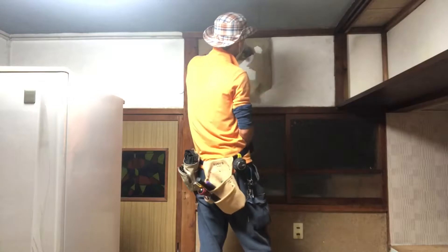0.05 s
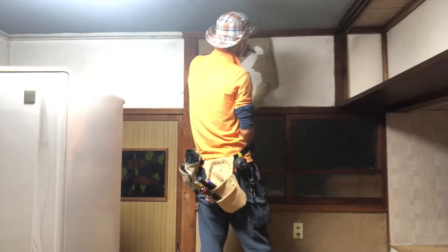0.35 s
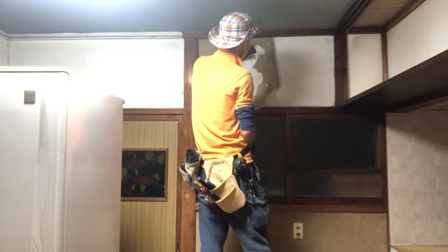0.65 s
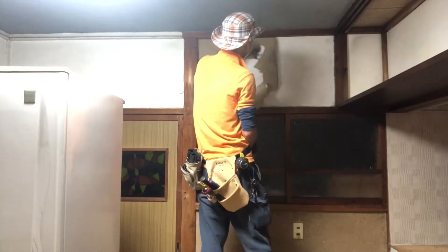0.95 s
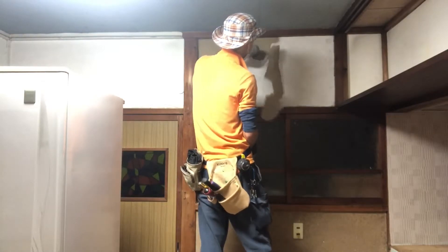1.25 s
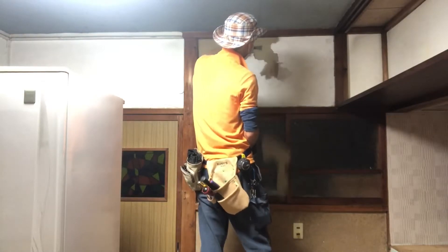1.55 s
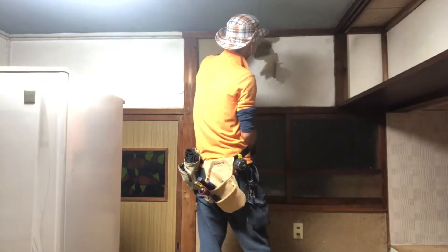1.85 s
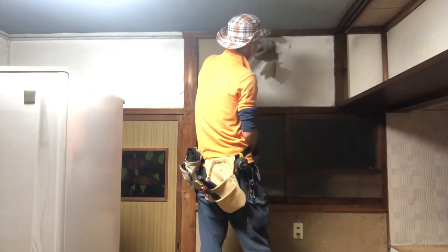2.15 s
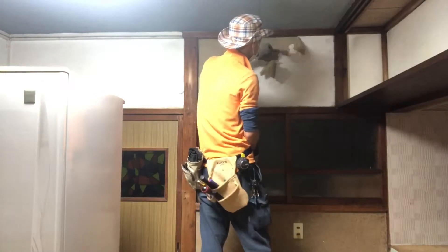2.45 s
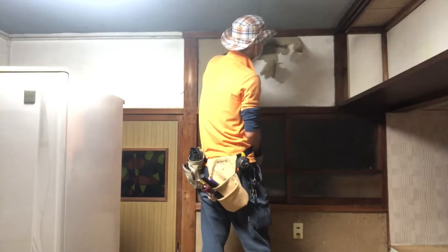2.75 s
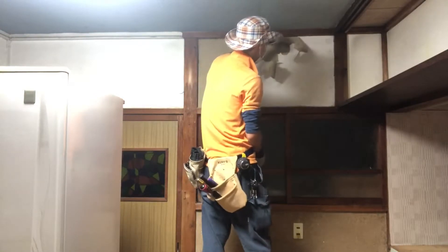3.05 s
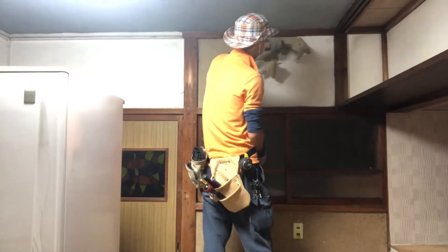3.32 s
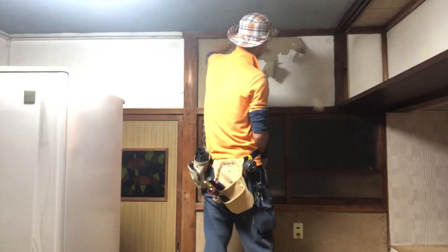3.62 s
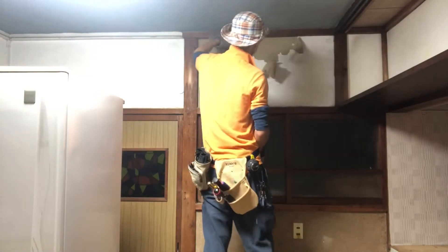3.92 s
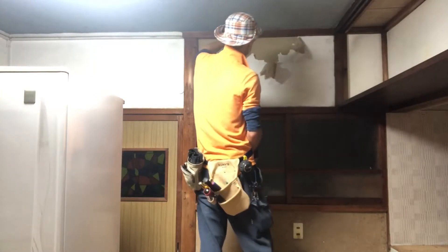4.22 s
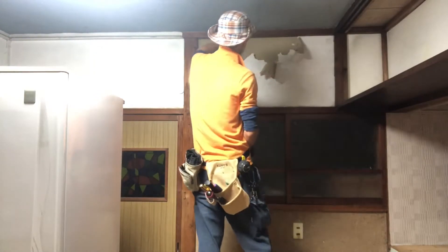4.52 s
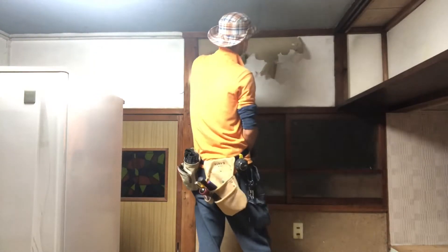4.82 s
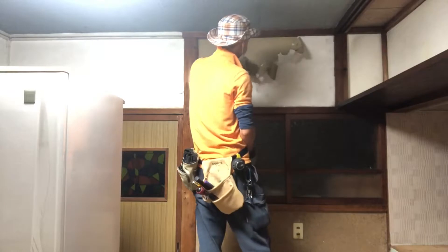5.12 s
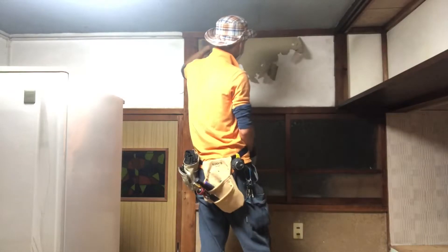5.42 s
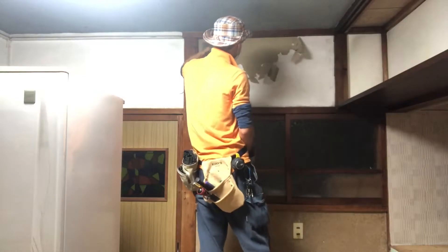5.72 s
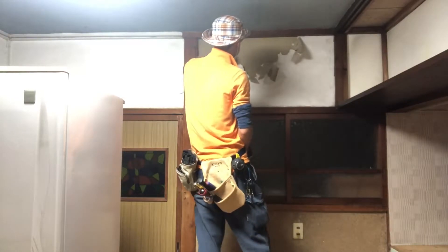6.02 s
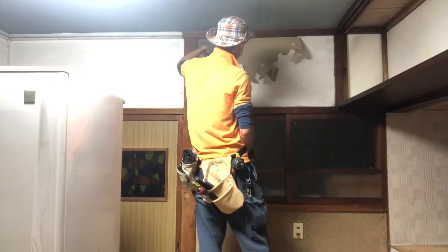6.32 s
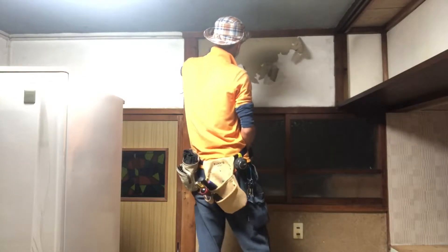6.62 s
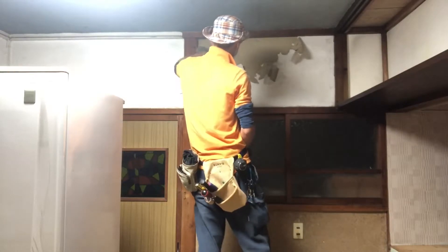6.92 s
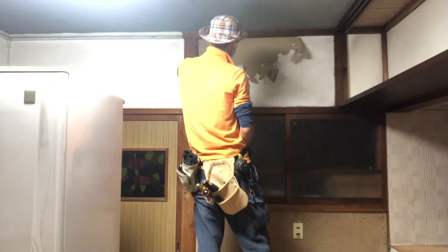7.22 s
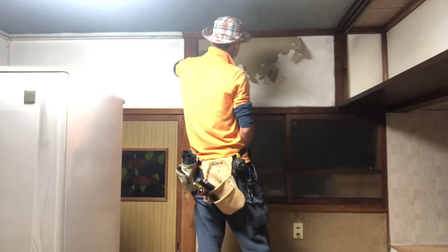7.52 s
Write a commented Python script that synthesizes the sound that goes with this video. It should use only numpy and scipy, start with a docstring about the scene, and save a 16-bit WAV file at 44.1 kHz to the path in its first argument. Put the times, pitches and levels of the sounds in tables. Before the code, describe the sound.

Brittle coating crackles and sand hisses as a metal blade pushes along a wall in irregular strokes. The blade judders, knocks and rings softly while the panel rumbles underneath and pieces snap away. Early on, a loosened sheet hits the wooden floor with a loud slap; a chip ticks down soon after, then busier scraping follows. It is heard from a short distance in a quiet, small room with a brief echo.

```python
"""A small wooden room, where a worker pushes a steel scraper under the dry coating of a sandy wall.
Each push crackles over hissing sand, a hollow rasp of loose sheet and the rumble of the panel.
The blade judders, knocks on the wall and sings as it slides on sand; larger pieces snap off.
A large sheet crashes onto the floorboards, and later a small chip lands with a tick."""
import sys
import numpy as np
from scipy import signal
from scipy.io import wavfile

SR = 44100
rng = np.random.default_rng(int(sys.argv[2]) if len(sys.argv) > 2 else 0)


def to_wav(s):
    """Save 16-bit WAV."""
    ch = np.atleast_2d(s).T  # columns
    pcm = np.round(np.clip(ch, -1, 1) * 32767)  # PCM
    wavfile.write(sys.argv[1], SR, pcm.astype(np.int16))


N = 337627
TIME = np.arange(N) / SR

# pushes of the scraper: t/s, swell/s, hold/s, crackle/dB, sand/dB, rasp/dB, wall rumble/dB
PUSHES = [ (0.0, 0.0017, 0.085, -46, -56.5, -52.5, -62), (0.131, 0.035, 0.11, -59.5, -56.5, -58.5, -64),
          (0.28, 0.051, 0.12, -49, -54.5, -59, -61), (0.36, 0.066, 0.15, -47.5, -58, -48.5, -65),
          (0.471, 0.0023, 0.0028, -47, -41, -46, -68), (0.71, 0.053, .03, -63.5, -72, -65, -70),
          (0.795, 0.062, 0.036, -44, -49.5, -46.5, -60.5), (0.919, 0.035, 0.024, -46.5, -54.5, -55.5, -63),
          (1.055, 0.031, 0.046, -44.5, -52, -51, -62), (1.164, 0.045, 0.047, -54.5, -62.5, -57, -69),
          (1.285, 0.018, 0.0077, -56.5, -57, -55.5, -59.5), (1.66, 0.056, 0.0088, -52, -49.5, -52, -52),
          (1.74, 0.06, 0.087, -48, -55, -57.5, -54), (2.036, 0.04, 0.088, -58.5, -63.5, -57, -66),
          (2.182, 0.067, 0.012, -50, -53, -52.5, -63), (2.70, 0.11, 0.075, -61, -54, -60.5, -63),
          (2.853, 0.048, .015, -54, -55.5, -60, -52), (3.014, 0.025, .06, -53, -61, -62.5, -62),
          (3.17, 0.057, 0.037, -51.5, -55.5, -59, -65), (3.907, 0.035, 0.058, -53.5, -50.5, -60.5, -56.5),
          (4.016, 0.03, .015, -67, -48, -78, -76), (4.104, 0.011, 0.051, -47, -52, -55, -52.5),
          (4.28, 0.028, 0.025, -52, -63, -58.5, -64), (4.412, 0.047, 0.026, -44, -49, -52, -58),
          (4.605, 0.093, 0.057, -42, -47, -50.5, -54), (4.69, 0.04, 0.053, -46, -50.5, -46, -69),
          (4.82, 0.023, .015, -44.5, -53.5, -52.5, -66), (4.87, 0.025, 0.052, -53, -55.5, -53.5, -64),
          (4.97, 0.012, 0.039, -60, -62, -53, -60.5), (5.57, 0.13, 0.017, -59, -49.5, -56.5, -54.5),
          (5.665, .08, 0.1, -46, -51, -55, -57.5), (5.894, 0.027, 0.049, -51, -57, -58, -73),
          (6.07, 0.017, 0.0077, -65.5, -63.5, -64.5, -80), (6.23, 0.039, .01, -63, -60, -60.5, -62),
          (6.305, 0.015, 0.065, -47.5, -48, -57.5, -59.5), (6.415, 0.033, 0.032, -47.5, -49, -50.5, -61.5),
          (6.645, 0.039, 0.063, -51.5, -54.5, -58.5, -67), (6.77, 0.032, .07, -65, -61.5, -63, -75),
          (6.92, 0.091, 0.059, -52.5, -53, -61, -56.5), (7.005, 0.083, 0.024, -44, -48, -49.5, -73),
          (7.21, .05, 0.019, -48, -54.5, -53.5, -62), (7.32, 0.02, 0.018, -80, -71, -67, -64),
          (7.44, 0.048, 0.067, -60.5, -60.5, -63, -66), (7.52, 0.026, 0.078, -53, -61, -52.5, -60)]
# bare steel slides on sand between pushes: t/s, swell/s, hold/s, steel/dB, wall rumble/dB
SLIDES = [(0.105, 0.024, .025, -52, -72), (0.60, 0.049, 0.12, -62.5, -64),
          (1.46, 0.0063, 0.068, -66.5, -64.5), (1.562, .008, 0.13, -62, -69),
          (2.545, .006, 0.0076, -63, -57), (2.61, 0.032, 0.12, -61, -63),
          (3.656, 0.0065, 0.11, -54.5, -59.5), (3.80, .03, 0.075, -61, -59.5),
          (5.34, 0.034, 0.055, -64, -62), (5.444, .006, 0.0067, -61, -74), (6.115, 0.026, 0.03, -60.5, -61),
          (6.235, 0.037, 0.025, -55.5, -63), (6.74, 0.027, 0.051, -61, -63), (7.28, 0.033, .11, -65, -62)]
CRACKLE_COLUMN, SAND_COLUMN, RASP_COLUMN, STEEL_COLUMN, RUMBLE_COLUMN = 3, 4, 5, 3, -1
# the blade knocks on the wall: t/s, thud/dB, f/Hz, steel clink/dB
KNOCKS = [(0.125, -44, 373, -60), (0.147, -60, 373, -54), (.4745, -30.5, 605, -67.5),
          (0.498, -46, 310, -70), (1.321, -50, 254, -52), (1.563, -72, 278, -51), (1.687, -53, 179, -51),
          (2.387, -49, 704, -60), (2.543, -46, 277, -54), (2.551, -43.5, 620, -66),
          (2.614, -39.5, 275, -54), (2.677, -45.5, 396, -61), (2.923, -51, 200, -70),
          (3.112, -47.5, 172, -67), (3.659, -48, 400, -61), (3.926, -66, 400, -43), (4.134, -44, 300, -37),
          (4.182, -43, 164, -70), (4.215, -47, 165, -75), (4.331, -47, 142, -75), (4.777, -39, 260, -63),
          (5.343, -55, 373, -62), (5.446, -72, 298, -55), (5.601, -54, 298, -46), (6.121, -42.5, 258, -61),
          (6.281, -45, 224, -58), (6.488, -44, 93, -68), (7.08, -43.5, 374, -70), (7.142, -47, 106, -73)]
# spectrum of rubbed sand: f/Hz, level/dB
SAND_HISS = [(1200, -27.5), (2800, -1.5), (4000, 2.5), (5200, 0), (6600, -4), (7600, -4), (8600, -12.5),
             (11000, -15.5), (15500, -16)]
# as the hand eases off, sand and crackle stop first; the loose sheet and the panel linger
SAND_RELEASE_S, CRACKLE_RELEASE_S, RASP_RELEASE_S, PANEL_RELEASE_S = 0.042, 0.039, 0.054, 0.061


def amp(db):
    """Decibels to gain."""
    return 10 ** (np.asarray(db) / 20)


def unit(x):
    """Scales to rms 1."""
    return x / np.sqrt(np.mean(x ** 2) + 1e-20)


def read(points, hz):
    """Reads a table on a log-frequency axis."""
    f, value = np.transpose(points)
    return np.interp(np.log(hz + 1), np.log(f + 1), value)


def add(mix, s, sound):
    """Mixes a sound in at time s."""
    part = mix[max(round(s * SR), 0):][:len(sound)]
    part += sound[:len(part)]


def colour(x, spectrum, size=4096):
    """Minimum-phase EQ of unit energy with the given spectrum."""
    log_gain = np.log(amp(read(spectrum, abs(np.fft.fftfreq(size, 1 / SR)))))
    taps = np.fft.ifft(np.exp(np.conj(signal.hilbert(log_gain)))).real
    return signal.oaconvolve(x, taps / np.linalg.norm(taps))[:len(x)]


def ring(x, modes, size=12000):
    """Passes x through a body with these resonances, at unit energy."""
    t = np.arange(size) / SR
    taps = sum(amp(db) * width * np.exp(-np.pi * width * t) * np.cos(2 * np.pi * hz * t)
               for hz, width, db in modes)
    return signal.oaconvolve(x, taps / np.linalg.norm(taps))[:len(x)]


def resonate(x, hz, width_hz):
    """A resonance of gain 1 whose pitch follows the curve hz."""
    turn = np.exp(2j * np.pi * np.cumsum(hz * np.ones(len(x))) / SR)
    pole = np.exp(-np.pi * width_hz / SR)
    return 2 * (turn * signal.lfilter([1 - pole], [1, -pole], x * turn.conj() + 1e-18)).real


def burst(swell_s):
    """Envelope that swells to 1 in the given time and dies away."""
    u = np.arange(SR // 4) / SR / swell_s
    return u * np.exp(1 - u)


def pulse(hz, cycles):
    """A pitched blow that swells over this many cycles and dies away."""
    shape = burst(cycles / hz)
    return shape * np.sin(2 * np.pi * hz * np.arange(len(shape)) / SR)


def wander(per_s):
    """Slow random modulation of rms 1."""
    knots = np.arange(0, N / SR + 1, 1 / per_s)
    return unit(np.interp(TIME, knots, rng.standard_normal(len(knots))))


def grains(per_s, spread_db):
    """Random tiny fractures: many small, a few large."""
    size = amp(spread_db * np.minimum(rng.exponential(1, N), 5))
    return unit(size * rng.choice([-1, 1], N) * (rng.random(N) < per_s / SR))


def effort(moves, column, release_s, lag_s=0):
    """Envelope of one layer: each hand movement builds, holds and lets go; overlaps add in power."""
    t, power = np.arange(SR) / SR, np.zeros(N)
    for move in moves:
        start, swell, hold = move[:3]
        build = np.sin(np.pi / 2 * np.minimum(t / swell, 1)) ** 2
        let_go = np.exp(-np.maximum(t - swell - hold, 0) / release_s)
        add(power, start + lag_s, (amp(move[column]) * build * let_go) ** 2)
    return np.sqrt(power)


def flakes(per_s, spread_db, cycles, shift_db, bands=24):
    """Flakes ring for a few cycles, each at its own pitch; the sizes that break keep shifting."""
    out, t = np.zeros(N), np.arange(SR // 50) / SR
    for hz in np.geomspace(500, 9000, bands):
        ping = np.exp(-t * hz / cycles) * np.sin(2 * np.pi * hz * t)
        cracks = grains(per_s / bands, spread_db) * amp(shift_db * wander(per_s=25))
        out += np.sqrt(hz) * unit(signal.oaconvolve(cracks, ping)[:N])
    return unit(out)


def peeling():
    """The coating cracks and sand rubs loose in stick-slip surges; the cracks ring the lifted flap."""
    # spectrum of the cracking coating: f/Hz, level/dB
    crackle_eq = [(300, -33), (900, -17), (1400, -1), (1800, 0.5), (2400, 0), (3400, -2), (5000, -10.5),
                  (8000, -25), (16000, -25)]
    # hollow spectrum of the loose sheet: f/Hz, level/dB
    rasp_eq = [(150, -30), (400, 5.5), (600, -1.5), (800, -1), (1030, 2), (1300, -0.5), (1900, -11),
               (5000, -46)]
    surges = amp(1.45 * wander(per_s=64))
    cracks = unit(colour(flakes(per_s=5000, spread_db=2.5, cycles=3.3, shift_db=2.5), crackle_eq))
    flap_hz = 2190 * 2 ** (0.428 * wander(per_s=14))  # the flap keeps changing size
    flap = unit(resonate(cracks, flap_hz, width_hz=200))
    crackle = amp(-2.5) * cracks + amp(-10.5) * flap
    crackle *= effort(PUSHES, CRACKLE_COLUMN, CRACKLE_RELEASE_S)
    sand = colour(grains(per_s=6000, spread_db=3.5), SAND_HISS)
    sand *= effort(PUSHES, SAND_COLUMN, SAND_RELEASE_S)
    rasp = unit(colour(flakes(per_s=3000, spread_db=2.0, cycles=3.03, shift_db=3.5), rasp_eq))
    rasp *= effort(PUSHES, RASP_COLUMN, RASP_RELEASE_S, lag_s=0.0047)  # the sheet must first come loose
    return surges * (crackle + amp(0.66) * (sand + rasp))


def blade():
    """Sand rings the steel, whose modes shift as it bends; it sings in a slide, softer in a push."""
    # modes of the steel: f/Hz, width/Hz, level/dB
    steel_modes = [(883, 133, 0), (1200, 92, 0), (2143, 160, -3), (2500, 150, -3.5), (3620, 99, -4),
                   (4060, 125, -1.5), (5835, 98, 2.5), (6220, 114, -1), (6530, 89, 0.5), (7300, 69, -9),
                   (9500, 110, -4), (10370, 135, -0.5), (11300, 110, -8.5), (12850, 100, -8),
                   (13950, 110, -17), (14520, 81, -13), (15500, 110, -17)]
    sliding = amp(-4.0) * effort(SLIDES, STEEL_COLUMN, release_s=0.039)
    pushing = amp(-12.5) * effort(PUSHES, SAND_COLUMN, SAND_RELEASE_S)
    contact = (sliding + pushing) * amp(2.13 * wander(per_s=65))
    for s, _, _, clink_db in KNOCKS:
        add(contact, s, amp(clink_db - 7) * burst(0.002))
    grit = contact * grains(per_s=4000, spread_db=2.5)
    bend = 1 + 0.013 * wander(per_s=4)
    singing = np.zeros(N)
    for hz, width, db in steel_modes:
        # the point of contact roams along the edge and favours now one mode, now another
        singing += resonate(grit * amp(db + 2.9 * wander(per_s=26)), hz * bend, width)
    return amp(9.5) * singing + amp(-10.5) * colour(grit, SAND_HISS)


def wall():
    """The panel rumbles under the scraper; each knock is a thud with a short woody rattle."""
    # spectrum of the wall panel: f/Hz, level/dB
    panel_eq = [(25, -21), (50, -5.5), (70, -2), (100, -3.5), (150, 0.5), (200, -2.5), (260, 0.5),
                (350, -1.5), (440, -4), (600, -10.5), (1200, -19.5), (4000, -82)]
    thuds = np.zeros(N)
    force = np.hypot(effort(PUSHES, RUMBLE_COLUMN, PANEL_RELEASE_S),
                     effort(SLIDES, RUMBLE_COLUMN, PANEL_RELEASE_S))
    for s, db, hz, _ in KNOCKS:
        add(thuds, s, amp(db - 3.0) * pulse(hz, cycles=1.0))
        add(force, s, amp(db - 10.5) * burst(0.0074))
    return thuds + colour(force * grains(per_s=1800, spread_db=2.0), panel_eq)


def room_tone():
    """A faint, steady bed of dark noise."""
    # spectrum of the room's air: f/Hz, level/dB
    air_eq = [(15, -67), (25, -31), (37, -9.5), (59, -4.5), (75, -6.5), (469, -15), (1450, -24.5),
              (2770, -28), (3170, -25), (3830, -26.5), (5430, -28), (5880, -28), (15500, -39)]
    return amp(-68) * colour(rng.standard_normal(N), air_eq)


def judders():
    """Uneven slips of the edge ring one stiff patch of coating: a short pitched rasp."""
    # judders of the edge: t/s, level/dB, f/Hz, swell/s
    cues = [(.078, -50, 2800, 0.0077), (0.201, -45, 2450, 0.006), (0.314, -44, 3230, 0.0017),
            (1.105, -44.5, 1450, 0.014), (4.05, -45.5, 4800, 0.0087), (4.441, -46.5, 2580, 0.018),
            (4.836, -47, 1610, 0.0068), (5.77, -47, 926, 0.0075)]
    out = np.zeros(N)
    for s, db, hz, swell_s in cues:
        shape = burst(swell_s)
        slips = rng.standard_normal(len(shape))
        patch = resonate(resonate(slips, hz, 0.18 * hz), hz, 0.2 * hz)
        add(out, s, amp(db) * shape * unit(patch))
    return out


def snaps():
    """A larger piece breaks: one sharp pulse and a short spray of grit."""
    # breaks in the coating: t/s, level/dB, f/Hz
    cues = [(0.08, -48, 2380), (0.312, -34.5, 3180), (0.473, -20, 2250), (1.075, -43, 2050),
            (1.688, -37, 4040), (1.714, -32.5, 3730), (2.148, -34, 2770), (2.258, -36.5, 3730),
            (2.384, -43.5, 1930), (2.543, -51.5, 1840), (2.903, -35.5, 3130), (3.266, -40, 1600),
            (3.926, -42, 5540), (4.028, -34, 4870), (4.056, -49, 5050), (4.131, -37, 4000),
            (4.433, -40, 2970), (4.497, -34.5, 2820), (5.774, -59, 1100), (5.811, -32.5, 3340),
            (6.312, -40.5, 4200), (6.874, -37.5, 4530), (6.969, -38.5, 2700)]
    # spectrum of the thrown grit: f/Hz, level/dB
    spray_eq = [(30, -34), (150, -7), (700, -3), (2500, 2.5), (6500, -4), (9000, -17), (15000, -17)]
    cracks, spray = np.zeros(N), np.zeros(N)
    t = np.arange(SR // 10) / SR
    for s, db, hz in cues:
        add(cracks, s, amp(db + 1.0) * pulse(hz, cycles=0.55))
        add(spray, s, amp(db - 7.5) * np.exp(-t / 0.0019))
    return cracks + spray * colour(grains(per_s=8100, spread_db=6.0), spray_eq)


def crash():
    """The falling sheet hits edge first, slaps flat on the boards and crumbles, echoing in the room."""
    # impacts of the sheet: t/s, shatter/dB, floor thud/dB, swell/s
    impacts = [(1.833, -29.5, -38, 0.0092), (1.859, -29.5, -33, 0.0013), (1.87, -38.5, -29.5, 0.0033),
               (1.887, -38, -36, 0.0091), (1.94, -43, -43, 0.0079), (1.983, -57.5, -54, 0.018)]
    # spectrum of the shattering sheet: f/Hz, level/dB
    shatter_eq = [(40, -57), (120, -10), (260, -3.5), (500, -2.5), (800, -3.5), (1050, -1.5), (1400, -9),
                  (2500, -7), (4000, -14.5), (6400, -18.5), (8500, -27), (15500, -44)]
    # modes of the floorboards: f/Hz, width/Hz, level/dB
    floor_modes = [(69, 11, -19), (85, 12, 11.5), (197, 23, -16.5), (265, 22.6, 9), (361, 18, 9),
                   (434, 9.5, 9.5), (568, 25, 2), (727, 16, -13), (764, 15, -5), (980, 32, -4),
                   (1060, 18, -16), (1250, 28, -4)]
    shatter, thud = np.zeros(N), np.zeros(N)
    for s, shatter_db, thud_db, swell_s in impacts:
        add(shatter, s, amp(shatter_db) * burst(swell_s))
        add(thud, s, amp(thud_db) * burst(swell_s))
    pieces = colour(shatter * grains(per_s=14000, spread_db=2.0), shatter_eq)
    boards = ring(thud * grains(per_s=8800, spread_db=2.5), floor_modes)
    return room(pieces, wet_db=-3.5) + amp(0.5) * room(boards, wet_db=-3.5)


def landings():
    """The falling sheet slaps the floor sharply; later a small chip ticks and rebounds."""
    # slaps of the sheet, then ticks of the chip: t/s, level/dB, f/Hz
    cues = [(1.8382, -31, 1040), (1.8584, -18, 910), (1.8598, -33, 754), (1.868, -28, 885),
            (3.6036, -34, 1180), (3.607, -27.5, 1080), (3.6228, -37.5, 1050)]
    out = np.zeros(N)
    for s, db, hz in cues:
        add(out, s, amp(db) * pulse(hz, cycles=0.51))
    return out


def room(x, wet_db, size=26000):
    """Direct sound plus dense reflections from close walls, each band dying at its own speed."""
    # decay of the wooden room: f/Hz, t60/s
    decay = [(100, 0.48), (300, 0.4), (1000, 0.33), (2500, 0.32), (6000, 0.27), (14000, 0.21)]
    reflections = rng.choice([-1., 1.], size) * (rng.random(size) < 4000 / SR)
    reflections[:SR // 400] = 0  # pre-delay
    hz, t, bands = signal.stft(reflections, SR, nperseg=256)
    fade = amp(-60 * t / read(decay, hz)[:, None])
    tail = signal.istft(bands * fade, SR, nperseg=256)[1]
    return x + amp(wet_db) * signal.fftconvolve(x, tail / np.linalg.norm(tail))[:N]


def scene():
    """The worker's body shades the wall, so much of the scraping arrives by way of the room."""
    scraping = amp(-4.0) * room(peeling() + judders(), wet_db=-3.5)
    steel = amp(-1.5) * room(blade(), wet_db=-5.0)
    thuds = amp(-2.0) * room(wall(), wet_db=-4.0)
    breaks = amp(-1.07) * room(snaps(), wet_db=-1.0)
    floor_hits = room(landings(), wet_db=-4)
    return np.tile(scraping + steel + thuds + breaks + floor_hits + room_tone() + crash(), (2, 1))


def record(dry):
    """A mono microphone with a low cut and a steep band limit."""
    low_cut_hz, high_cut_hz = 41, 15750
    lean = signal.sosfilt(signal.butter(2, low_cut_hz, "highpass", fs=SR, output="sos"), dry)
    low_pass = signal.firwin(511, high_cut_hz, window=("kaiser", 9), fs=SR)
    return signal.oaconvolve(lean, low_pass[None], "same")


dry = scene()
out = record(dry)
to_wav(out)
```